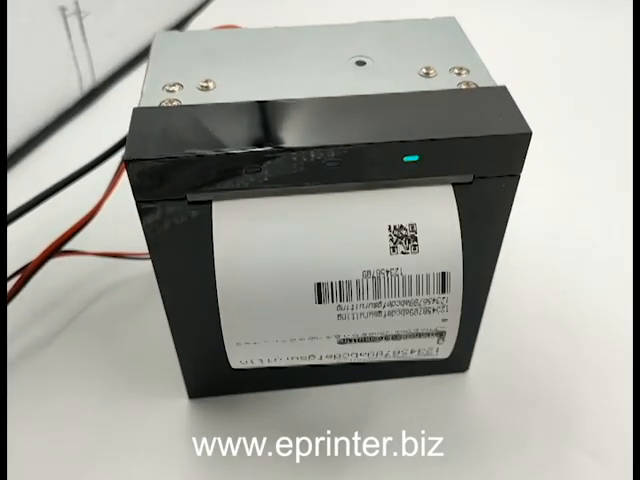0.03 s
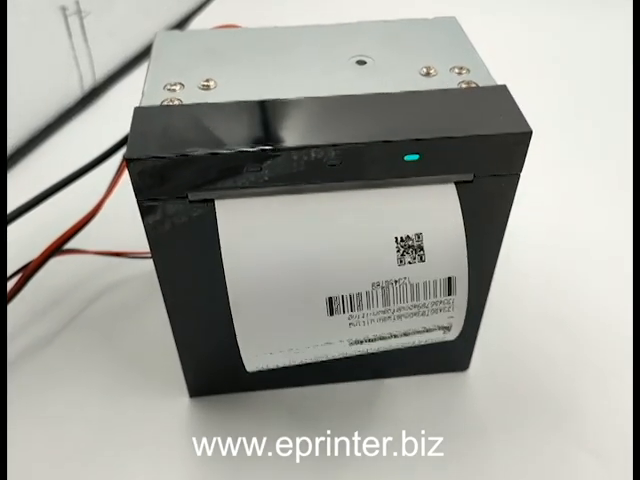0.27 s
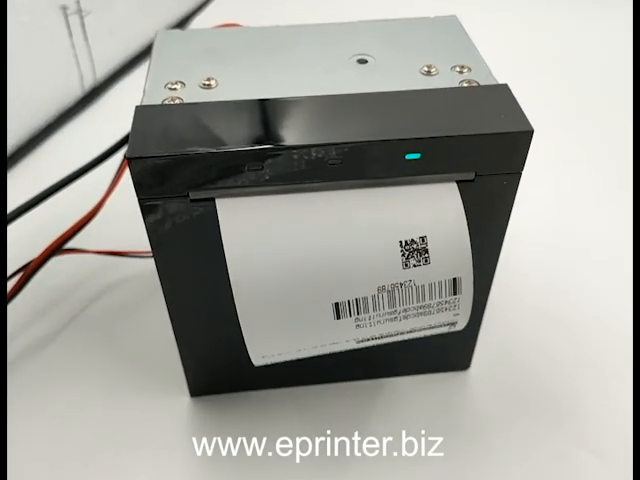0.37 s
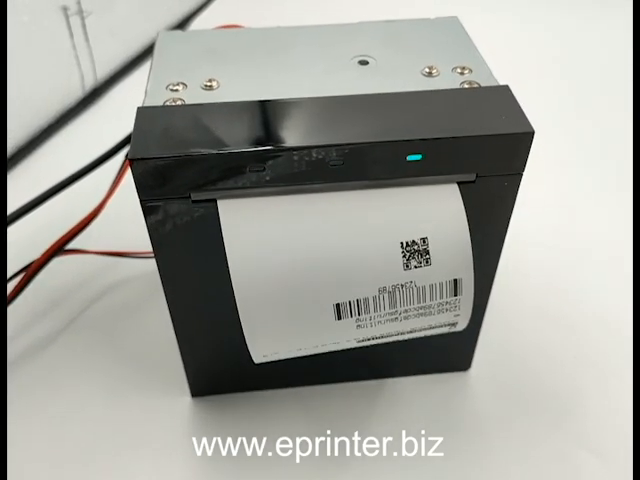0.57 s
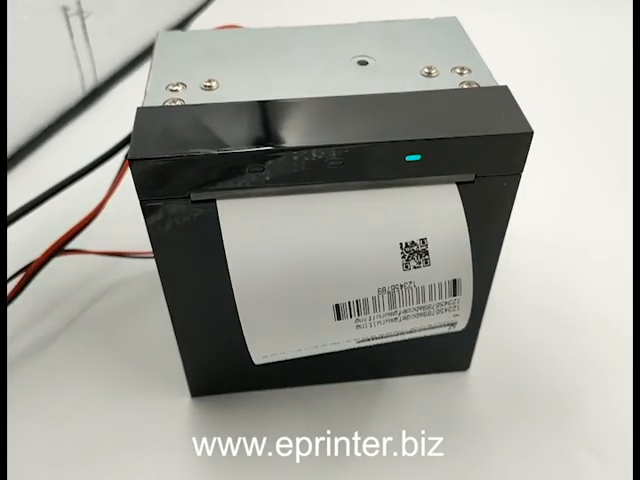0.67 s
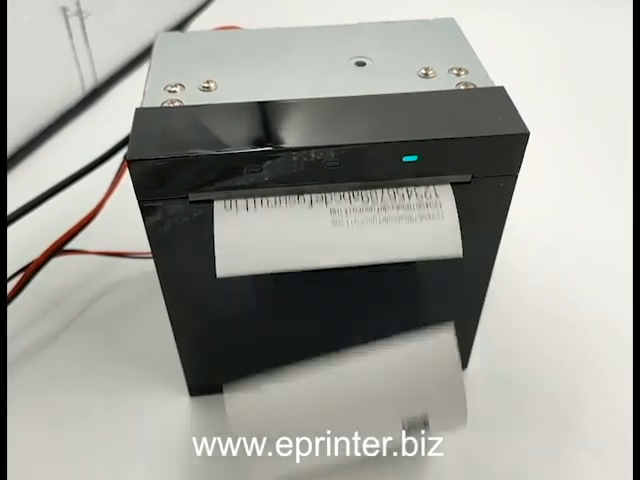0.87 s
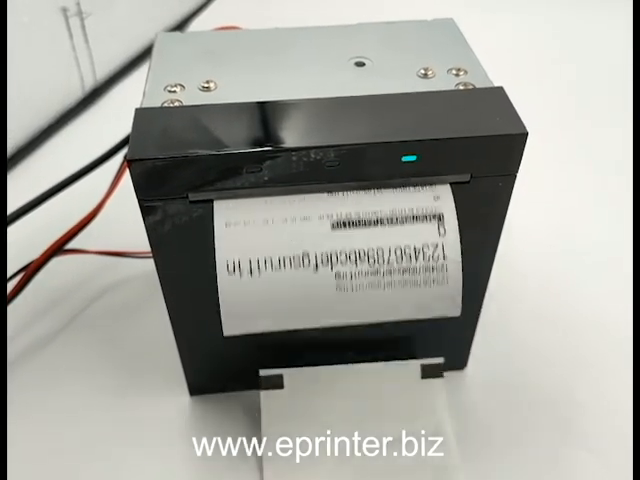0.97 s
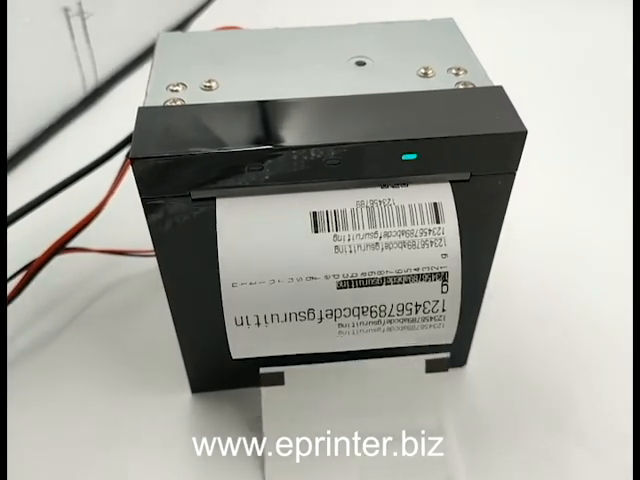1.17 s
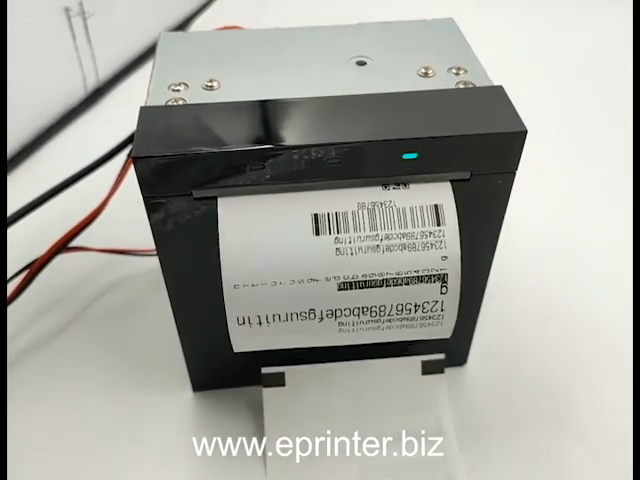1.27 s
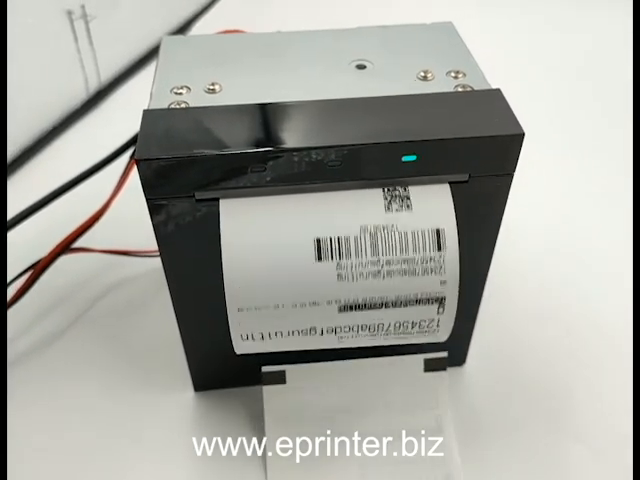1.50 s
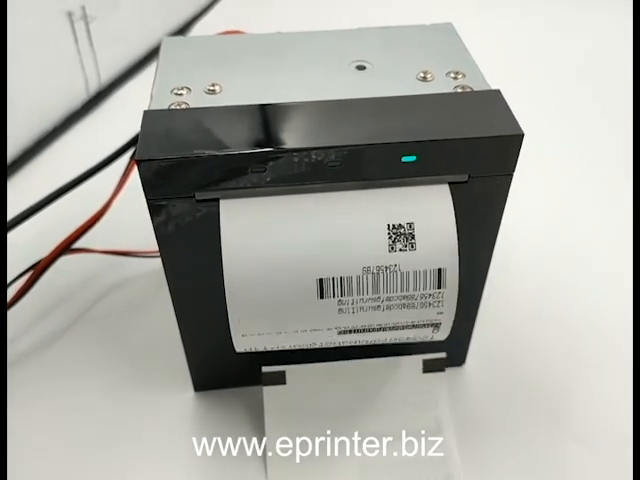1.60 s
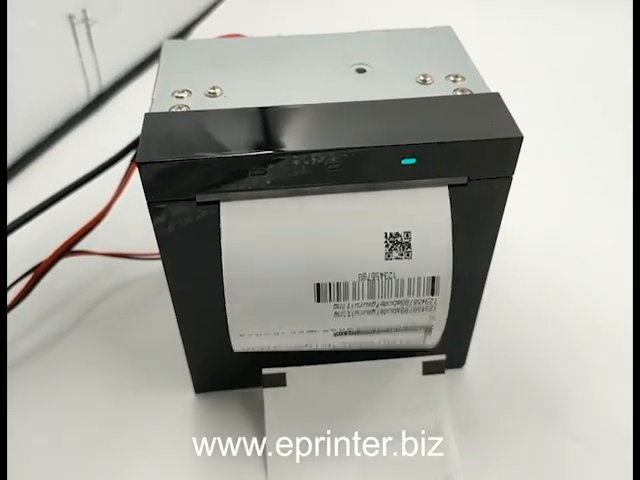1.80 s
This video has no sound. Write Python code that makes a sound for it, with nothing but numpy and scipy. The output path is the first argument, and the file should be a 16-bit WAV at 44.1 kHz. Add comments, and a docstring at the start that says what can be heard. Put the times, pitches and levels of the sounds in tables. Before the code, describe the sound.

A small thermal printer, heard close in a quiet room, peels its paper with a rasp, feeds in three buzzing, whirring bursts, then its cutter whirs, snaps twice loudly and settles with faint ticks.

```python
"""A small thermal receipt printer on a desk in a quiet room, over a low, uneven background noise.
A soft hiss dies away and a faint bright tick sounds. The paper peels off the print head, and the stepper
motor runs three times: step tones sweep through the case resonances, gears whirr and paper rasps in noise.
Then a little motor drives the cutter through the paper: the blade snaps, clacks home and springs back,
the gears chatter as it brakes, and a few small ticks end the sound."""
import sys
import numpy as np
from scipy import signal
from scipy.fft import rfft, irfft, next_fast_len
from scipy.io import wavfile
from scipy.ndimage import uniform_filter1d, map_coordinates

SR = 44100
rng = np.random.default_rng(int(sys.argv[2]) if len(sys.argv) > 2 else 0)


def transcribe(signal):
    """Save signal, clipped to [-1, 1], as a 16-bit WAV file at the path in sys.argv[1]."""
    frames = np.atleast_2d(signal).T
    limited = np.clip(frames, -1, 1)
    pcm = np.round(limited * 32767).astype(np.int16)
    wavfile.write(sys.argv[1], SR, pcm)


N = 81585
T = np.arange(N) / SR
TOP_HZ = 15800  # band limit of the whole sound

# colour of the blade scraping on paper: hz, relative_db
BLADE_TONE = [(1650, -20), (2800, -1), (4210, -2.5), (4630, 0), (5200, -6.5), (8610, 1.5), (9600, -8.5),
              (11000, -13.5), (14800, -16), (16000, -19)]
# colour of the cutter's gear train: hz, relative_db
TRAIN_TONE = [(150, -55), (250, -20), (447, 1.5), (571, -9), (646, 3.5), (834, -9.5), (912, -3),
              (1560, -3.5), (1740, -4), (2150, 1.5), (3600, -21), (4680, -32), (7920, -120)]


def amp(db):
    """Decibels to gain."""
    return 10 ** (np.asarray(db) / 20)


def unit(x):
    """Scaled to rms 1."""
    return x / np.sqrt(np.mean(x ** 2) + 1e-20)


def along(points, hz):
    """Read a curve of (hz, value) points on a log frequency axis."""
    f, v = np.transpose(points)
    return np.interp(np.log(hz + 1), np.log(f + 1), v)


def curves(rows, fade_s=0.0052):
    """An on-off gate over the rows' span, fading just outside it, then each column per sample."""
    s, *cols = np.transpose(rows)
    gate = np.clip(np.minimum(T - s[0], s[-1] - T) / fade_s + 1, 0, 1)
    return [gate] + [np.interp(T, s, c) for c in cols]


def wobble(rate):
    """A smooth random curve, rate knots a second."""
    return map_coordinates(rng.standard_normal(int(N * rate / SR) + 4), [T * rate])


def filtered(x, response):
    """x shaped by a gain for each frequency."""
    m = next_fast_len(N + SR // 2)
    return irfft(rfft(x, m) * response(np.fft.rfftfreq(m, 1 / SR)), m)[:N]


def noise(tone, grain_db=0):
    """Coloured noise of rms 1, clumped into millisecond grains."""
    grains = amp(grain_db * wobble(1200))
    return unit(filtered(rng.standard_normal(N) * grains, lambda hz: amp(along(tone, hz))))


def cycle(hz):
    """Running phase of a frequency curve."""
    return 2 * np.pi * np.cumsum(hz) / SR


def sine(hz):
    """A steady tone of peak 1."""
    return np.sin(2 * np.pi * hz * T)


def decay(s, t60, attack_s=0.00045):
    """Envelope of a blow at time s: a quick rise, then an exponential fall of 60 dB in t60 seconds."""
    t = np.maximum(T - s, 0)
    return amp(-60 * t / t60) * (1 - np.exp(-t / attack_s))


def background():
    """A low noise floor whose level drifts slightly."""
    # colour of the floor: hz, relative_db
    floor_tone = [(12, -68), (20, 8), (36, -10.5), (130, -17), (248, -24), (367, -26.5), (434, -28.5),
                  (802, -28.5), (1000, -32.5), (5850, -45.5), (7730, -49.5), (10200, -60), (16000, -50)]
    return amp(-49.5 + 0.4 * wobble(11.6)) * noise(floor_tone)


def opening_hiss():
    """A soft noise that dies away from the very start."""
    mix = noise(BLADE_TONE) + 0.89 * noise(TRAIN_TONE)
    return amp(-54.5) * mix * decay(0, t60=0.17)


def room(x):
    """The room's tail is decaying noise; each frequency dies at its own speed."""
    # reverberation: hz, t60_s
    room_t60 = [(200, 0.75), (2000, 0.38), (8000, 0.47), (15000, 0.44)]
    hz, t, z = signal.stft(rng.standard_normal(SR * 2 // 3), SR, nperseg=256)
    fading = z * amp(-60 * t / along(room_t60, hz)[:, None])
    tail = signal.istft(fading, SR, nperseg=256)[1]
    tail[:SR // 250] = 0  # 4 ms before the first reflections
    return signal.fftconvolve(x, tail / np.linalg.norm(tail))[:N]


def faint_tick():
    """A tiny bright burst of noise with a thin, longer ring."""
    # colour of the tick: hz, relative_db
    tick_tone = [(6000, -37), (8500, 15), (10000, -19), (13000, -9), (15300, 10)]
    start_s = 0.115
    burst = amp(-40) * noise(tick_tone) * decay(start_s, t60=0.029)
    return burst + amp(-58) * decay(start_s, t60=0.17) * sine(8550)


def bump():
    """A soft low thud of slow-rising noise as the paper gathers speed."""
    # colour of the thud: hz, relative_db
    bump_tone = [(20, -30), (90, -14), (117, 8), (170, -2), (260, -12.5), (600, -50)]
    return amp(-41) * decay(0.47, t60=0.32, attack_s=0.0067) * noise(bump_tone)


def peel():
    """A short gritty rasp as the paper tears free of the head and starts to move."""
    # loudness before the trim: time_s, level_db
    peel_levels = [(0.242, -37), (0.254, -24.5), (0.278, -29.5), (0.292, -59)]
    # colour of the rasp: hz, relative_db
    peel_tone = [(470, -62), (800, -29), (1070, -36), (1570, -10), (1700, -16), (1850, -2.5), (2150, -3),
                 (2410, -16), (2950, -9.5), (5180, -8), (8440, 0), (10100, -21.5), (16000, -44)]
    trim_db = 1.5
    on, level_db = curves(peel_levels, fade_s=0.00024)
    return on * amp(level_db + trim_db) * noise(peel_tone, grain_db=-1.5)


def brake():
    """The cutter's gears chatter to a halt in grainy noise."""
    # loudness of the chatter: time_s, level_db
    brake_levels = [(1.582, -40.5), (1.593, -33), (1.603, -35.5), (1.618, -58)]
    # colour of the chatter: hz, relative_db
    brake_tone = [(240, -40), (400, -36), (1070, -2.5), (1410, -5), (1510, -4), (1910, 5), (2370, -7.5),
                  (3640, -5.5), (6000, -20), (7800, -54), (13200, -120)]
    on, level_db = curves(brake_levels)
    return on * amp(level_db) * noise(brake_tone, grain_db=1)


def cutter():
    """A motor tone and gear noise push the scraping blade through the paper and draw it back."""
    # the stroke: time_s, blade_scrape_db, gear_train_db
    stroke = [(1.322, -56, -47.5), (1.342, -52, -43), (1.346, -40, -48), (1.381, -43.5, -41.5),
              (1.386, -31, -35), (1.425, -30, -37), (1.44, -32, -43), (1.485, -50, -37), (1.505, -23, -32),
              (1.53, -42.5, -46), (1.56, -39, -39), (1.582, -45, -43), (1.612, -67, -42)]
    # the motor's tone, its pitch jittered below: time_s, pitch_hz, level_db
    motor = [(1.33, 936, -52), (1.4, 1524, -67), (1.52, 1503, -50), (1.55, 1523, -43.5),
             (1.58, 1630, -43.5), (1.61, 1620, -49)]
    stroke_on, blade_db, train_db = curves(stroke, fade_s=0.0064)
    blade = amp(blade_db) * noise(BLADE_TONE, grain_db=1.0)
    train = amp(train_db) * noise(TRAIN_TONE, grain_db=2.5)

    motor_on, pitch_hz, level_db = curves(motor, fade_s=0.01)
    phase = cycle(pitch_hz * (1 + 0.0046 * wobble(110.8)))
    return stroke_on * (blade + train) + motor_on * amp(level_db) * np.sin(phase)


def clacks():
    """Blows of the blade and ticks of mechanism and paper: three noise bands and a ring of steel modes."""
    # the blows: start_s, low_db, middle_db, high_db, t60_s (of the middle and high body)
    blows = [(0.073, -56, -45, -50, 0.036), (0.2436, -62, -37, -25.5, 0.062), (.437, -36, -32, -46, 0.079),
             (0.499, -33, -32, -31, 0.019), (0.8669, -36, -41, -46.5, 0.083),
             (.985, -30.5, -39, -39, 0.017), (1.069, -65, -49, -45, .02), (1.306, -52, -47, -43, 0.056),
             (1.4504, -50, -23, -23, .022), (1.4538, -26, -21, -22, 0.055), (1.4567, -28, -22, -24, 0.04),
             (1.4665, -32, -32, -33, .025), (1.492, -49, -38, -29, 0.029), (1.4962, -31, -24, -21.5, 0.04),
             (1.5012, -39, -28, -30, 0.07), (1.513, -39, -32, -32, .04), (1.5525, -54, -47, -28, 0.016),
             (1.5571, -42, -41, -26, .028), (1.671, -59, -38.5, -43, 0.032),
             (1.699, -53.5, -55, -54.5, 0.14), (1.734, -58, -46, -41, 0.073), (1.821, -63, -62, -59, 0.15)]
    # modes of the steel parts: pitch_hz, relative_db, t60_s
    steel = [(711, -7, .09), (1075, -3, .08), (1885, -1, .09), (2476, -6, .09), (2762, 0, .05),
             (3208, -3, .09), (3850, -2, .07), (4950, -2, .06), (5555, -4, .05), (7267, -3, .055),
             (7800, -4, .06), (8440, -2, .07), (8900, -4, .07)]
    # colours of the three bands: hz, relative_db
    low_tone = [(100, -6.5), (250, 2), (480, 0), (700, 10), (900, -8), (1080, 9), (1300, -6), (1900, 2),
                (2600, -21)]
    mid_tone = [(1400, -17), (2300, 0), (3800, 0.5), (5400, -0.5), (7000, 0), (9000, -67)]
    high_tone = [(4500, -83), (7000, -2.5), (8700, 6), (10000, -18), (16000, -15.5)]
    ring_db, ring_scatter_db = -13, 4.0  # ring level against the middle band
    crack_db, crack_t60 = -6, 0.0047
    out = np.zeros(N)
    for start_s, low_db, mid_db, high_db, t60 in blows:
        out += amp(low_db) * noise(low_tone) * decay(start_s, 0.84 * t60)
        upper_bands = amp(mid_db) * noise(mid_tone) + amp(high_db) * noise(high_tone)
        crack = amp(crack_db) * decay(start_s, crack_t60, attack_s=0.0001)
        out += upper_bands * (decay(start_s, t60) + crack)
        for hz, mode_db, ring_t60 in steel:
            gain = amp(mid_db + ring_db + mode_db + rng.normal(0, ring_scatter_db))
            tone = np.sin(2 * np.pi * (hz * T + rng.random()))
            out += gain * decay(start_s, ring_t60) * tone
    return out


def snaps():
    """Very short, bright noise cracks as the blade snaps through the paper, then off its stop."""
    # the cracks: start_s, level_db, centre_hz
    cracks = [(1.4504, -16, 7900), (1.4959, -12.5, 5100)]
    width_octaves = 0.33

    def band(centre_hz):
        """Blade noise narrowed around one frequency."""
        def response(hz):
            octaves_off = np.log2((hz + 1) / centre_hz)
            return amp(along(BLADE_TONE, hz)) / (1 + (octaves_off / width_octaves) ** 4)
        return unit(filtered(rng.standard_normal(N), response))

    return sum(amp(level_db) * band(centre_hz) * decay(start_s, t60=0.016, attack_s=0.0001)
               for start_s, level_db, centre_hz in cracks)


def rotor():
    """Noise knocks as the coils switch on; after each run a ring that ends as the coils let go."""
    # jerks of the rotor: start_s, level_db
    kicks = [(0.242, -25.5), (0.865, -30.5), (0.905, -35), (1.076, -41)]
    # rings after the runs: start_s, level_db
    stops = [(.778, -32.5), (.99, -45), (1.281, -36.5)]
    # colour of a knock: hz, relative_db
    kick_tone = [(150, -44), (420, -40), (570, 4), (760, 4.5), (900, -11), (1060, 0.5), (1350, -11),
                 (1900, -4.5), (2600, -11.5), (3600, -40)]
    ring_hz, ring_t60 = 660.5, 0.26
    hold_s, release_s = 0.039, 0.0047  # the coils hold the rotor this long, then let go
    out = np.zeros(N)
    for start_s, level_db in kicks:
        out += amp(level_db) * noise(kick_tone) * decay(start_s, t60=0.066)
    for start_s, level_db in stops:
        held = np.exp(-np.maximum(T - start_s - hold_s, 0) / release_s)
        ring = np.sin(2 * np.pi * ring_hz * (T - start_s))
        out += amp(level_db) * decay(start_s, ring_t60, attack_s=0.0044) * held * ring
    return out


def case(x):
    """The case passes the vibration on and rings at its resonances."""
    # resonances: pitch_hz, gain_db, t60_s
    modes = [(657.6, 4, 0.25), (1058, 10.5, 0.12), (1914, 8, 0.09)]
    ring = np.zeros(N)
    for hz, gain_db, t60 in modes:
        rate = np.log(1000) / t60  # decay per second
        ring += amp(gain_db) * 2 * rate / SR * np.exp(-rate * T) * np.cos(2 * np.pi * hz * T)
    return x + signal.fftconvolve(x, ring)[:N]


def whine(rate):
    """Sine tones of motor and gears, wavering in level and pitch, sing while the step rate is high."""
    # tones at full speed: pitch_hz, mean_rms_db
    tones = [(1314, -57), (1752, -46), (2190, -47), (2627, -49.5), (3110, -56), (5662, -51.5)]
    singing = uniform_filter1d(1. * (rate > 1810), size=900)  # steps per s; smoothed over 20 ms
    out = np.zeros(N)
    for hz, level_db in tones:
        level = amp(level_db + 2 * wobble(29.64)) * np.sqrt(2)
        out += level * np.sin(cycle(hz * (1 + 0.001 * wobble(82.6))))
    return singing * out


def motor_steps(rate, phase, drive_db):
    """Each step is a stack of harmonics; at high rates the steps blur into a plain tone."""
    # colour of the harmonics: hz, relative_db
    step_tone = [(100, -15), (230, -9), (310, -6), (440, -5), (650, 2.5), (850, -1), (1060, -9.5),
                 (1300, -12), (1600, -6.5), (2000, -17), (2700, -19), (4000, -17.5), (9000, -33)]
    trim_db, rough_db, uneven = -0.5, 2.5, 0.45
    overtone_gain = 1 / (1 + (rate / 500) ** 8)  # fades above 500 steps per s
    buzz = np.zeros(N)
    for k in range(1, 25):
        level = amp(along(step_tone, k * rate)) * (k * rate < TOP_HZ)
        if k > 1:
            level = level * overtone_gain
        buzz += level * np.cos(k * phase + 2 * np.pi * rng.random())
    strength = amp(drive_db + trim_db + rough_db * wobble(250))
    # every other step is weaker
    return strength * (1 + uneven * overtone_gain * np.cos(phase / 2)) * buzz


def rubbing(levels, phase):
    """Noise of paper, gears and platen roller, pulsing in time with the motor steps."""
    # colours of the rubbing parts: hz, relative_db
    paper_tone = [(1650, -27), (2800, -15), (3100, -2.5), (3460, -8), (5130, -5.5), (5520, -6.5),
                  (5980, -6.5), (7390, -2.5), (8610, -0.5), (8990, -2), (10400, -31.5), (12500, -20.5),
                  (16000, -19.5)]
    gear_tone = [(1100, -22), (1480, -13), (1640, -1.5), (1830, -3), (1900, 11.5), (1975, -11),
                 (2070, -0.5), (2150, -8), (2500, -38)]
    upper_gear_tone = [(1700, -31), (2050, -3), (2200, 5.5), (2380, -4.5), (2480, -1), (2630, 6),
                       (2850, -8), (3100, -0.5), (3500, -37), (4400, -30)]
    roller_tone = [(150, -44), (260, -25), (370, -19), (436, -9), (514, -14), (610, 0), (740, 0), (800, -6),
                   (1060, -1), (1400, -15), (2200, -27.5)]
    on, paper_db, gear_db, upper_db = curves(levels)
    # each level has its own fixed trim
    paper = amp(paper_db - 1) * noise(paper_tone, grain_db=1.0)
    gears = amp(gear_db - 6.5) * noise(gear_tone, grain_db=4)
    upper_gears = amp(upper_db - 3.5) * noise(upper_gear_tone, grain_db=2.5)
    roller = amp(-43.5) * noise(roller_tone)
    return on * (1 + 0.25 * np.cos(phase)) * (paper + gears + upper_gears + roller)


def feed():
    """Motor steps shake the case in three runs while gears, roller and paper rub along with them."""
    # motor runs, before jitter and trim: time_s, rate_steps_per_s, drive_db
    runs = [
        [(.243, 110, -61), (.295, 141, -44), (.314, 348, -34), (.333, 382, -36), (.341, 470, -34.5),
         (.347, 575, -28), (.357, 704, -29), (.366, 755, -34), (.376, 920, -56), (.42, 1710, -52),
         (.455, 1870, -44), (.47, 1910, -22), (.495, 1820, -41), (.52, 2620, -58), (.73, 2900, -60),
         (.748, 1000, -60), (.756, 310, -36), (.774, 302, -38.5)],
        [(.903, 135, -50), (.922, 188, -41), (.936, 330, -31.5), (.955, 338, -47), (.975, 218, -40),
         (.992, 133, -54)],
        [(1.076, 131.4, -48), (1.095, 201, -38), (1.112, 325, -32.5), (1.128, 411, -39.5), (1.14, 590, -33),
         (1.155, 690, -32), (1.164, 760, -50), (1.184, 1060, -32), (1.19, 1860, -34), (1.202, 1895, -23),
         (1.216, 1880, -41), (1.222, 2530, -56), (1.247, 2400, -44), (1.256, 337, -36.5), (1.276, 293, -34.5)],
    ]
    # rubbing in each run, before the trims: time_s, paper_rasp_db, gear_whirr_db, upper_gear_whirr_db
    rub_levels = [
        [(0.284, -29, -48, -36), (0.298, -49, -42, -52), (0.316, -37.5, -27, -43), (0.328, -48, -40.5, -50),
         (0.378, -50.5, -41, -47), (0.414, -35.5, -31.5, -40), (0.428, -37, -31.5, -46),
         (0.44, -35.5, -33.5, -41), (0.474, -39, -33.5, -41.5), (0.494, -40, -41, -42),
         (0.552, -36.5, -32, -39), (0.59, -38, -41.5, -42), (0.63, -36.5, -32.5, -38.5),
         (0.69, -36.5, -42.5, -37.5), (0.716, -35.5, -34, -31.5), (0.746, -35.5, -35.5, -36),
         (0.778, -55, -51, -47)],
        [(0.903, -54, -57, -60), (0.931, -37.5, -39, -38), (0.967, -44, -40, -45), (0.987, -45, -46, -41),
         (0.998, -49, -39, -57)],
        [(1.075, -49.5, -51, -54), (1.109, -38, -44, -34.5), (1.125, -40.5, -31, -49), (1.155, -43, -48, -43),
         (1.179, -38, -40.5, -39), (1.199, -36.5, -26.5, -36), (1.249, -35, -40, -34), (1.271, -42.5, -41, -39),
         (1.28, -48, -39, -55)],
    ]
    steps, rub = np.zeros((2, N))
    for run, levels in zip(runs, rub_levels):
        on, rate, drive_db = curves(run)
        jitter = 0.02802 * wobble(300) * np.minimum(1, 600 / rate)  # less at high rates
        phase = cycle(rate * (1 + jitter))
        steps += on * motor_steps(rate, phase, drive_db)
        rub += rubbing(levels, phase) + whine(rate)
    return case(steps) + rub


def scene():
    """The printer, the room's answer, the opening hiss and the background."""
    paper_feed = feed() + rotor() + peel() + bump()
    cutting = cutter() + brake() + clacks() + snaps()  # clacks also hold the ticks before the cut
    printer = paper_feed + cutting + faint_tick()
    return (printer + amp(-14.5) * room(printer) + background() + opening_hiss())[None]


def record(dry):
    """The highest peaks are rounded off; nothing is kept above the band limit."""
    ceiling, hardness = 0.36, 6
    rounded = dry / (1 + np.abs(dry / ceiling) ** hardness) ** (1 / hardness)
    return np.array([filtered(x, lambda hz: hz < TOP_HZ) for x in rounded])


dry = scene()
out = record(dry)
transcribe(out)
```